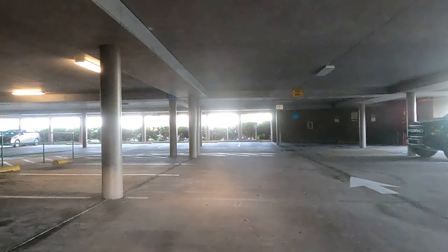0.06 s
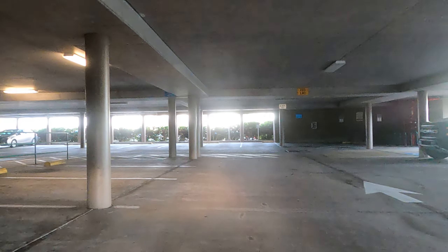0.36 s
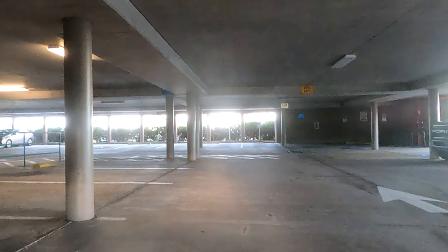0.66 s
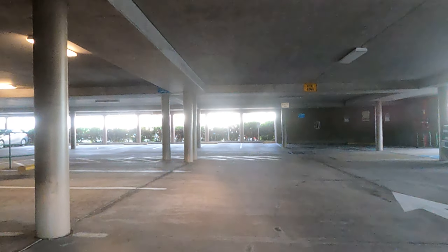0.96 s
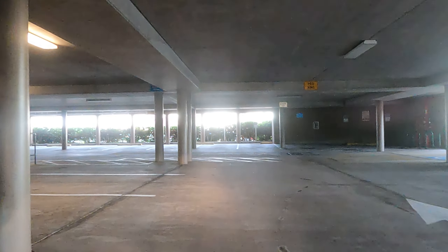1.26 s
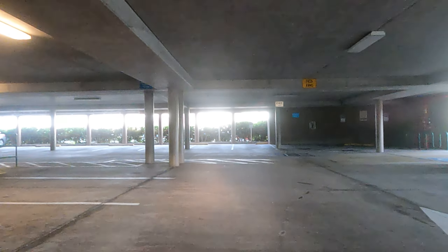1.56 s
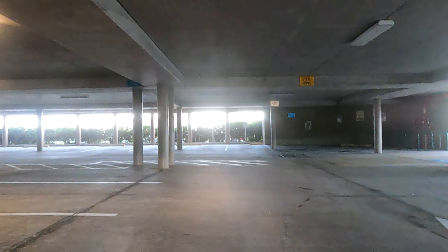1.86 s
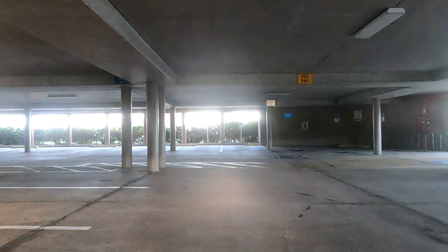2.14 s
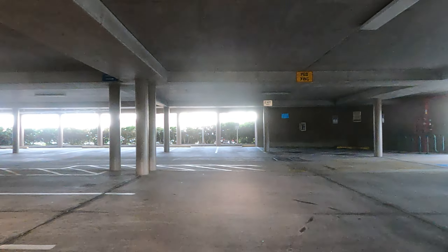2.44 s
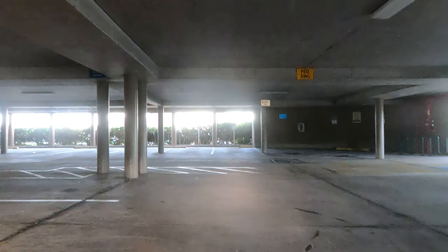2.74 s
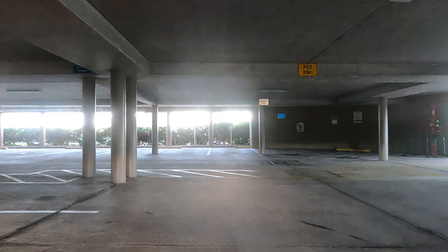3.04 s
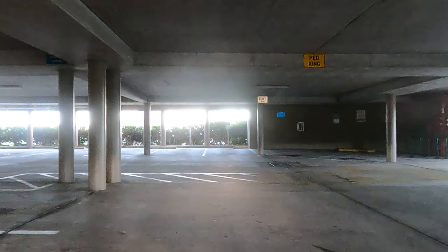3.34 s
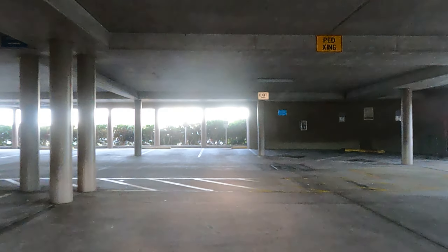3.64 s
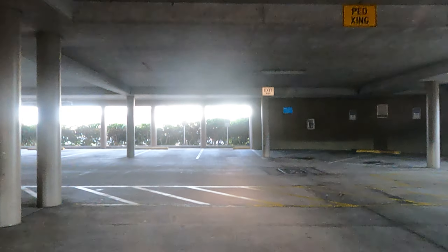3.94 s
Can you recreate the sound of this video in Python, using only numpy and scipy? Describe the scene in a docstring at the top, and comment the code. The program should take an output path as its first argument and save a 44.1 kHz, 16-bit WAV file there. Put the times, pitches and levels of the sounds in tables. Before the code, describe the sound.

An eight-cylinder engine rumbles through a concrete parking garage, heard from the slowly rolling vehicle. The revs dip, then jump at about 0.8 seconds and again at 1.8, each time with a barking, hissing exhaust rasp. They fall away, with a small nudge near 2.6 seconds, to a lumpy idle by 3.1, then rise slightly around 3.7. A low boom swells and fades in the echo throughout.

```python
"""An eight-cylinder engine rolls slowly through a concrete parking garage, heard from the vehicle itself.
The throttle is blipped twice, nudged once and opened again at the end; between blips the revs sink to a
lumpy idle. Uneven firings drive the exhaust, which rumbles around the firing rate and barks at the pipe's
resonances. Turbulent gas rasps and hisses, and a boom of nearly fixed pitch hangs under the low ceiling."""
import sys
import numpy as np
from scipy import signal
from scipy.fft import rfft, irfft
from scipy.io import wavfile
from scipy.ndimage import uniform_filter1d, minimum_filter1d

SR = 44100
rng = np.random.default_rng(int(sys.argv[2]) if len(sys.argv) > 2 else 0)


def dump(signal):
    """Clip the signal to [-1, 1] and save it as 16-bit WAV at the path in sys.argv[1]."""
    limited = np.clip(np.atleast_2d(signal).T, -1, 1)
    pcm = np.round(limited * 32767).astype(np.int16)
    wavfile.write(sys.argv[1], SR, pcm)


N = 176400


def undb(db):
    """Amplitude ratio of a level in decibels."""
    return 10 ** (np.asarray(db) / 20)


def unit(x):
    """Normalisation to an rms of 1."""
    return x / np.sqrt(np.mean(x ** 2))


def curve(table):
    """Linear interpolation of (time, value) rows at every sample."""
    return np.interp(np.arange(N) / SR, *np.array(table, float).T)


def smooth(x, samples):
    """Triangular smoothing: a moving average applied twice."""
    return uniform_filter1d(uniform_filter1d(x, samples), samples)


def walk(rate_hz):
    """Slow random modulation: smoothed Gaussian steps with an rms of 1."""
    hold = int(SR / rate_hz)
    return unit(smooth(np.repeat(rng.standard_normal(size=400), hold)[:N], hold))


def colour(x, points):
    """Minimum-phase filtering through (frequency [Hz], gain [dB]) points."""
    hz, db = np.array(points, float).T
    size = 2 * N
    gain_db = np.interp(np.log(np.fft.rfftfreq(size, 1 / SR) + 1), np.log(hz), db)
    cepstrum = irfft(np.log(undb(gain_db)))
    cepstrum[1:N] *= 2  # folding the cepstrum makes the filter causal
    cepstrum[N + 1:] = 0
    return irfft(rfft(x, size) * np.exp(rfft(cepstrum)))[:N]


def steady(x, span_s):
    """Division by the running rms flattens the envelope."""
    return x / np.sqrt(smooth(x ** 2, int(span_s * SR)) + 1e-18)


def garage(x, wet_db, t60_s=1.46, treble_t60_s=0.42, first_echo_s=0.009, change_s=0.5):
    """Reverberation: direct sound plus dense echoes off concrete, whose treble decays sooner."""
    t = np.arange(SR) / SR
    lead = SR // 4  # a mirrored lead-in: the room is already sounding at the start
    source = np.concatenate([x[lead:0:-1], x])
    place = np.arange(len(source)) / SR / change_s
    wet = np.zeros(len(source) + SR)
    slow, fast = (np.exp(-np.log(1000) * t / t60) * (t > first_echo_s) for t60 in (t60_s, treble_t60_s))
    for k in range(int(place[-1]) + 2):  # the echo pattern changes as the vehicle rolls
        noise = rng.standard_normal(SR)
        low = signal.sosfilt(signal.butter(2, 1500, fs=SR, output="sos"), noise)
        tail = low * slow + (noise - low) * fast
        near = np.flatnonzero(np.abs(place - k) < 1)
        crossfade = np.cos(np.pi / 2 * (place[near] - k))
        echo = signal.fftconvolve(source[near] * crossfade, tail / np.linalg.norm(tail))
        wet[near[0]:near[0] + len(echo)] += echo
    return x + undb(wet_db) * wet[lead:lead + N]


def boom(centre_hz=134.3, drift=0.014, waver_db=3.5):
    """Amplitude modulation: a low tone swells and fades, its pitch independent of the revs."""
    # envelope of the boom (time [s], level [dB])
    boom_level = [(0.2, -24), (0.78, -16), (0.9, -21.5), (1.55, -24), (1.75, -12.5), (2.0, -30.5),
                  (2.3, -14), (2.75, -17), (3.06, -28), (3.2, -19)]
    hz = centre_hz * (1 + drift * walk(14))
    tone = np.sin(2 * np.pi * np.cumsum(hz) / SR)
    return unit(tone * undb(waver_db * walk(8.7))) * undb(curve(boom_level) - 1.5)


def gas(turns, spectrum, puff_share, wet_db):
    """Turbulence noise: a decaying puff in each firing interval on top of an even rush."""
    gate = 1 - puff_share * (1 - np.exp(-(turns % 1) / 0.2))
    rush = garage(gate * rng.standard_normal(N), wet_db)
    return steady(colour(rush, spectrum), span_s=0.06)


def rasp_and_hiss(turns):
    """Turbulent exhaust gas radiates two bands of noise: a midrange rasp and a treble hiss."""
    # spectra of the bands (frequency [Hz], gain [dB])
    rasp_spectrum = [(450, -5), (750, -3.5), (930, 2), (1300, -3.5), (1800, -7.5), (2350, -13),
                     (2800, -14.5), (3600, -23), (5000, -33.5), (12000, -88)]
    hiss_spectrum = [(1800, -2), (3300, 2), (5600, -1.5), (7500, -5), (9500, -11), (11000, -19.5),
                     (15500, -21)]
    # their envelopes (time [s], level [dB])
    rasp_level = [(0.1, -37.5), (0.51, -44), (0.76, -29.5), (0.88, -27.5), (1.0, -30.5), (1.62, -38.5),
                  (1.82, -29), (1.95, -27.5), (2.05, -30.5), (2.53, -35), (2.92, -42), (3.55, -42.5),
                  (3.7, -39.5), (3.8, -34.5)]
    hiss_level = [(0.12, -59.5), (0.68, -65), (0.87, -55), (1.76, -61), (1.91, -54), (2.14, -60.5),
                  (3.7, -65), (3.92, -59)]
    rasp = gas(turns, rasp_spectrum, puff_share=0.4, wet_db=-1) * undb(curve(rasp_level) + 2.5)
    hiss = gas(turns, hiss_spectrum, puff_share=0.41, wet_db=-1.5) * undb(curve(hiss_level) + 2.5)
    return rasp + hiss


def firings(turns, scatter_db=3, scatter_intervals=0.073):
    """A quasi-periodic pulse train: each cylinder has its own strength and lag, each firing scatters."""
    # the eight firings of one cycle (level [dB], lag [firing intervals])
    cylinders = [(0.5, -0.034), (-8, 0.1), (-1.5, -0.11), (0.5, .12), (-5.5, .2), (-3.5, -0.072),
                 (-8, 0.092), (3, -0.047)]
    k = np.arange(int(turns[-1]))
    db, lag = np.array(cylinders, float)[k % len(cylinders)].T
    time_draw, size_draw = rng.standard_normal(size=(1200, 2))[k].T
    at = np.interp(k + lag + scatter_intervals * time_draw, turns, np.arange(N))
    size = undb(db + scatter_db * size_draw)
    i = at.astype(int)  # each pulse is shared between two neighbouring samples
    return (np.bincount(i, size * (1 - at + i), N + 1) + np.bincount(i + 1, size * (at - i), N + 1))[:N]


def bark(pulses, hz, turns, full_throttle_hz_per_s=170):
    """Pipe resonance: firings ring the upper modes, and harmonics sweep through them as the revs climb."""
    # response of the exhaust pipe (frequency [Hz], gain [dB])
    pipe_response = [(200, -28.5), (340, -5.5), (385, 0.5), (425, -4), (470, 2.5), (520, -3), (625, -1),
                     (668, 0.5), (715, -5.5), (900, -20), (1500, -63), (6000, -115)]
    # envelope of the bark (time [s], level [dB])
    bark_level = [(0.03, -24), (0.44, -33), (0.66, -13), (0.8, -23.5), (1.39, -20.5), (1.49, -28.5),
                  (1.73, -15), (2.06, -26.5), (2.55, -24), (2.89, -30.5), (3.48, -27), (3.72, -16),
                  (3.86, -23)]
    climb = uniform_filter1d(np.gradient(hz), SR // 10) * SR
    throttle = np.clip(climb / full_throttle_hz_per_s, 0, 1)
    tonal_share = 0.35 * hz.min() / hz * (1 - throttle) + 0.72 * throttle
    pipe_hz, pipe_db = np.array(pipe_response, float).T
    rolloff_db_per_octave = 6.5 + 9 * throttle
    overtones = np.zeros(N)
    for k in range(2, 7):
        db = np.interp(k * hz, pipe_hz, pipe_db) - rolloff_db_per_octave * np.log2(k) + 2 * walk(22)
        overtones += undb(db) * np.sin(2 * np.pi * k * turns)
    howl = steady(garage(overtones, wet_db=-8.5), span_s=0.18)
    ring = steady(colour(garage(pulses, wet_db=7.5), pipe_response), span_s=0.16)
    return (np.sqrt(tonal_share) * howl + np.sqrt(1 - tonal_share) * ring) * undb(curve(bark_level) - 1)


def rumble(pulses, turns):
    """Uneven firings put energy between the harmonics; reverberation blends it into a lumpy rumble."""
    # spectra of the rumble and the deep bass (frequency [Hz], gain [dB])
    rumble_spectrum = [(50, -42.5), (100, -12.5), (165, 3.5), (210, -2.5), (285, -9.5), (400, -13),
                       (600, -34), (4000, -110)]
    deep_spectrum = [(10, -56), (38, -16), (55, -16), (73, -0.5), (100, -9.5), (700, -110)]
    # their envelopes (time [s], level [dB])
    rumble_level = [(0.05, -20), (0.52, -17), (0.7, -20.5), (1.4, -16.5), (1.58, -16), (1.76, -16.5),
                    (3.2, -19.5)]
    deep_level = [(0.03, -39), (0.33, -21), (0.98, -23.5), (1.2, -38), (1.91, -22), (3.82, -29)]
    phasor = np.exp(2j * np.pi * turns)  # demodulation isolates the part at the firing rate
    amplitude = signal.fftconvolve(pulses / phasor, np.hanning(SR // 10) / (SR // 20), "same")
    uneven = garage(pulses - 2 * np.real(amplitude * phasor), wet_db=7)
    lumps = steady(colour(uneven, rumble_spectrum), span_s=0.056) * undb(curve(rumble_level))
    deep = steady(colour(uneven, deep_spectrum), span_s=0.19) * undb(curve(deep_level) - 1)
    return lumps + deep


def exhaust_note(hz, turns, pipe_hz=204, half_width_hz=32):
    """Periodic firing gives partials at 1/2, 1, 3/2 and 2 times its rate; a pipe mode lifts the last."""
    # envelopes of the firing tone and of the partial at 3/2 of it (time [s], level [dB])
    tone_level = [(0.1, -12), (0.3, -22.5), (0.58, -18.5), (0.74, -13.5), (0.86, -18), (1.0, -12.5),
                  (1.48, -14.5), (1.62, -22.5), (1.76, -14.5), (1.84, -12.5), (1.94, -17), (2.18, -11),
                  (2.35, -20), (3.4, -19.5), (3.7, -11.5), (3.9, -20)]
    fifth_level = [(0.25, -19), (0.7, -31.5), (2.45, -31.5), (2.62, -18), (2.95, -16), (3.3, -24),
                   (3.7, -24), (3.86, -16)]
    tone_db = curve(tone_level)
    octave_db = -18 - 10 * np.log10(1 + ((2 * hz - pipe_hz) / half_width_hz) ** 2)
    partials = [(0.5, tone_db - 15.5), (1, tone_db), (1.5, curve(fifth_level)), (2, octave_db)]
    note = sum(undb(db + 1.7 * walk(30)) * np.sin(2 * np.pi * ratio * turns) for ratio, db in partials)
    note = signal.sosfilt(signal.butter(2, 65, "highpass", fs=SR, output="sos"), note)
    return garage(note, wet_db=-8.5)


def scene():
    """Superposition: one engine speed drives every voice of the exhaust, and the boom is added."""
    # engine speed (time [s], firing rate [Hz])
    revs = [(0, 150), (0.3, 120), (0.42, 93), (0.53, 86), (0.78, 332), (0.84, 331), (0.9, 298), (1.3, 172),
            (1.53, 124), (1.63, 124), (1.83, 335), (1.89, 341), (2.17, 235), (2.3, 204), (2.41, 192),
            (2.55, 138), (2.64, 149), (3.0, 108), (3.13, 96), (3.53, 96), (3.74, 136), (4, 131)]
    hz = uniform_filter1d(curve(revs), SR // 30) * (1 + 0.01 * walk(20))
    turns = np.cumsum(hz) / SR  # phase, one turn per firing
    pulses = firings(turns)
    flow = rasp_and_hiss(turns)
    engine = rumble(pulses, turns) + exhaust_note(hz, turns) + bark(pulses, hz, turns)
    return (engine + flow + boom())[None]


def record(dry, span_s=0.018, target_db=-6, gain_share=0.26, limit_db=-2, top_hz=15700):
    """Dynamic compression evens the level, a limiter holds down the peaks, and a low-pass cuts the top."""
    rms = np.sqrt(smooth(dry ** 2, int(span_s * SR)))
    even = dry * (undb(target_db) / rms) ** gain_share
    allowed = np.minimum(1, undb(limit_db) / (np.abs(even) + 1e-9))
    gain = smooth(minimum_filter1d(allowed, SR // 40), SR // 80)
    return signal.sosfilt(signal.ellip(8, 0.2, 70, top_hz, fs=SR, output="sos"), even * gain)


dry = scene()
out = record(dry)
dump(out)
```